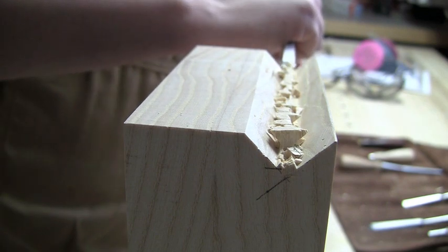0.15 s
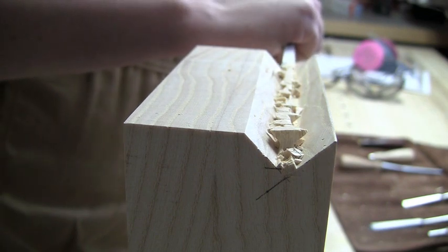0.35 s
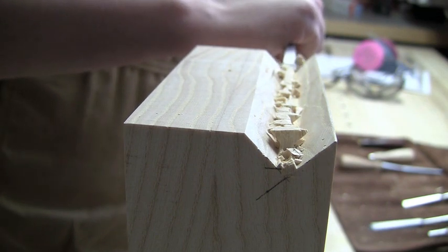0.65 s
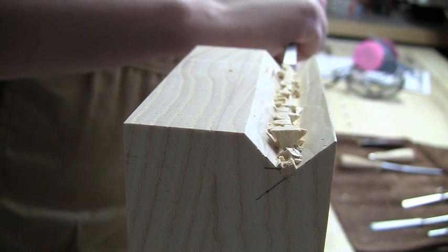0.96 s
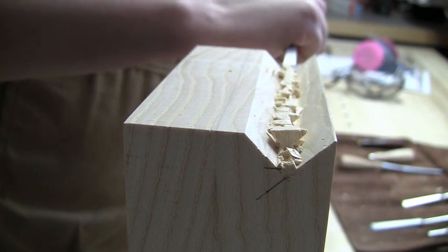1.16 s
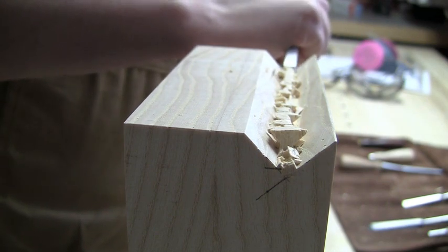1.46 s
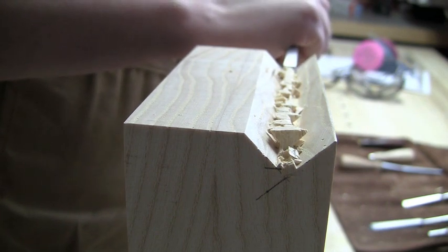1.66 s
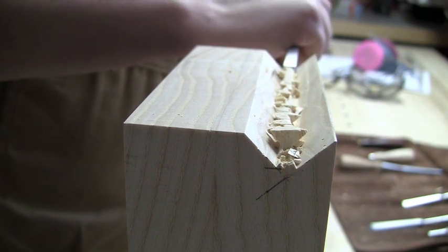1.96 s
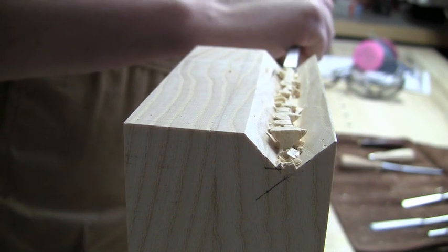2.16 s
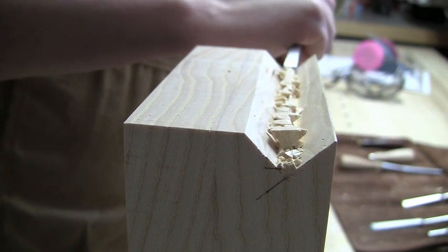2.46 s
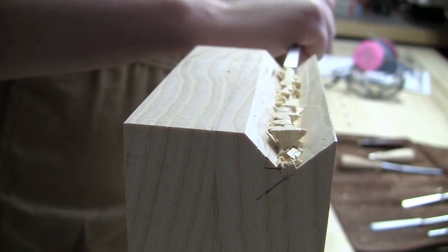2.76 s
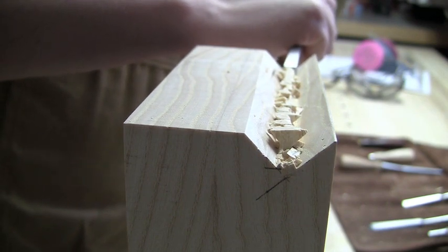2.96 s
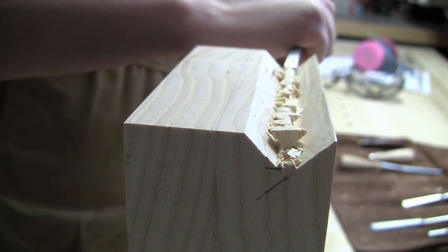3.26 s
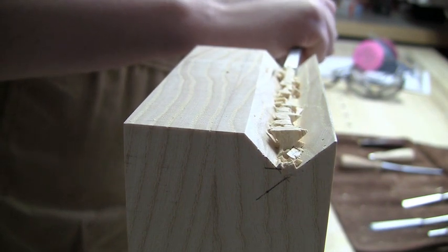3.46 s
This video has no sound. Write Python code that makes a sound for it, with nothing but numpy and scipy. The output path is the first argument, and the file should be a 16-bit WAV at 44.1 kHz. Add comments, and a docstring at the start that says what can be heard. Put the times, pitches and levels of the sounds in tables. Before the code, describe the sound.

Sharp woody chisel knocks at about four a second, turning deeper halfway, with short room ring

```python
"""A quiet workshop still rings from an earlier blow: noise shaped by pitch and left to die away.
Then a mallet drives a chisel into a wooden block, about four blows a second, close to the microphone.
Each blow is a shove, fading chisel tones and a crunch of noise; bench tones and room noise ring on behind.
Halfway the chisel takes a new bite and the blows turn deeper. Later, fibres tear and chips tick as
grainy bursts of hiss. The microphone bends the loudest cracks against its ceiling."""
import sys
import numpy as np
from scipy import signal
from scipy.fft import rfft, irfft
from scipy.io import wavfile
from scipy.ndimage import uniform_filter1d

SR = 44100
rng = np.random.default_rng(int(sys.argv[2]) if len(sys.argv) > 2 else 0)


def digitize_waveform(pressure):
    """Quantize a signal to 16-bit integers and store it at the path in sys.argv[1].

    Rows of a 2-D input are taken as channels; values are limited to [-1, 1].
    """
    field = np.atleast_2d(pressure).T
    bounded = np.clip(field, -1, 1)
    quanta = np.round(bounded * 32767).astype(np.int16)
    wavfile.write(sys.argv[1], SR, quanta)


N = 158760

# steady workshop background: (frequency [Hz], relative level [dB])
BACKGROUND_SPECTRUM = [(20, -9.5), (50, -30), (75, 20.5), (105, 24.5), (200, -13.5), (500, -11.5),
                       (1500, -63), (4000, -43), (9000, -21.5), (16000, -43)]
# how alike the two channels of a noise are: (frequency [Hz], likeness [0 to 1])
CHANNEL_LIKENESS = [(60, .93), (250, 0.93), (640, 0.84), (1400, 0.39), (3100, 0.75), (6800, 1), (15000, 1)]
# workshop reverberation: (frequency [Hz], relative level [dB])
ROOM_SPECTRUM = [(30, -63.5), (75, -8.5), (130, -4), (210, -3), (290, -6.5), (420, -2), (520, 0.5),
                 (660, -4.5), (820, -5.5), (1180, -7), (1550, -3), (1950, -8), (2220, -13), (2600, -8),
                 (2950, -9.5), (3550, -10.5), (4250, -13.5), (5300, -19), (5800, -19), (6600, -25.5),
                 (7300, -25), (8700, -28), (10400, -37), (12000, -34), (16000, -64)]
# basic fading of the room: (frequency [Hz], time to fall by 60 dB [s])
ROOM_FADE = [(60, 1), (250, 0.72), (1000, 0.77), (3000, 0.61), (6000, 0.52), (14000, 0.28)]
# tearing fibres and chips: (time [s], level [dB], time to fade to 37 % [s])
CHIP_EVENTS = [(2.553, -46, 0.037), (2.609, -38.5, 0.036), (2.79, -49, 0.043), (3.387, -37.5, 0.011)]
# hiss of tearing fibres: (frequency [Hz], relative level [dB])
CHIP_SPECTRUM = [(500, -28), (4000, 0), (7200, 4.5), (9500, 0), (12500, -1), (16000, -21)]
# bench and workshop tones, before the sustain factor: (frequency [Hz], relative level in first bite [dB],
# relative level in second bite [dB], time to fall by 60 dB [s])
BENCH_TONES = [(138, -9, -7, .6), (172, -3, -2, .6), (235, 3, 4, .3), (347, -3, -1, .36),
               (398, -10, -9, .42), (466, -4, -2, .3), (529, -2, 4, .3), (549, -4, -4, .45),
               (618, -5, -4, .42), (704, -9, -7, .4), (806, -9, -3, .44), (936, -5, -8, .36),
               (967, -8, -9, .35), (1002, -2, -6, .43), (1037, -5, -11, .42), (1170, -7, -10, .33),
               (1311, -9, -10, .4), (1381, -2, -1, .35), (1437, -6, -7, .4), (1568, -9, -6, .33),
               (1605, -9, 0, .35), (1678, -7, -6, .33), (1900, -9, -9, .3), (2855, -8, -11, .33),
               (3185, -9, -14, .33), (4300, -16, -15, .3), (6030, -17, -21, .3)]
# strongly damped chisel and block tones, before each blow's pitch and length factors: (frequency [Hz],
# relative level in first bite [dB], relative level in second bite [dB], time to fall by 60 dB [s])
CHISEL_TONES = [(273, -25, -20, 0.031), (482, -27.5, -1.5, 0.0091), (700, -6.5, -3, 0.01),
                (864, 4, -2, 0.013), (1191, -3, -3, 0.027), (1398, -17.5, -4.5, 0.036), (1915, 1, 4.5, .01),
                (2670, 0, -26, 0.017), (2920, -8.5, -3, 0.016), (3280, -11.5, 0, 0.0067),
                (3920, -5, -13.5, 0.019), (4430, 6, 14, 0.002), (5100, -28, -37, 0.0017)]
# crunch of the wood: (frequency [Hz], relative level [dB])
CRUNCH_SPECTRUM = [(100, -20), (700, -4), (3000, 4), (6000, 0.5), (10000, -14), (16000, -17.5)]
# mallet blows: (time [s], chisel pitch [factor], length [factor], then the strengths of
# thud [dB], knock [dB], clack [dB], crack [dB], splinter [dB])
BLOWS = [(0.1114, 1.19, 0.84, -0.2, -2, 0.1, -0.5, -0.5), (0.353, 1.16, 0.95, -2.8, -1, 0, 1, 8),
         (0.6001, 0.93, 1.23, -8, -2.5, -1, 2.8, 1.5), (0.8334, 1.02, 1.09, -8.5, -1.5, -1.7, 1.6, 0.9),
         (1.0706, 1.076, 1.2, -4, -1.5, 1, 0.4, 6), (1.2985, 1.02, 1.08, -7, -1.5, -1, 3.4, -3.2),
         (1.5318, 0.96, 1.23, -8.5, -2.5, -0.6, -1.1, 4), (1.804, 1.02, 1.15, -1, -6, -5, -13.5, -18),
         (2.026, 0.96, 1.04, 1, -1.4, -0.9, -2, -6.5), (2.247, 1, 1.3, 3.5, -1.5, 0, -6, -2.5),
         (2.4697, 1, 1.2, 2.5, -1.4, 1, -1.9, -2.0), (2.6987, 1.01, 1.18, 3, -0.8, 1.5, -2.2, -0.8),
         (2.9389, 1.02, 1.21, 2, -2.5, 0, 1.2, -1), (3.1835, 1.03, 0.96, -0.9, -1.5, -0.3, 2, 6),
         (3.4205, 1.076, 1.14, -7, -0.5, -3, 0.2, -2.9)]
# centres of thud, knock, clack, crack and splinter: (frequency [Hz])
STRENGTH_CENTRES = [400, 1000, 2100, 4600, 10000]

BACKGROUND_DB, LINGERING_DB = -44, -19.5
ROOM_DB, ROOM_RISE_S = -18, 0.0024
ROOM_SHARED = 0.42  # part of the room's power that is the same after every blow
EARLY_DB, EARLY_S = -4, 0.011  # extra level of the first reflections, and how fast it fades
LATE_S, LATE_DB_PER_S, LATE_MAX_DB = 0.12, 74.5, 6.5  # after this age the tail sinks faster for a while
RIPPLE_DB, RIPPLE_STEP_HZ = 3, 300
BENCH_DB, BENCH_SUSTAIN = -24, 1.15  # level, and a factor on the fading times
PUSH_DB, PUSH_S = 0.5, 0.00038
CHISEL_DB, CHISEL_RISE_S = 4, 0.00092
CHISEL_DETUNE = 0.008  # typical random pitch change, as a fraction
CRUNCH_DB, CRUNCH_PEAK_S = -5, 0.0014  # the peak time is stretched by each blow's length factor
CONTACT_S, AFTER_CONTACT_DB = 0.003, -7  # contact time before the length factor; level drop after it
BASS_HZ = 49.6  # below this all blows have the same tone
NEW_BITE_S = 1.7
LOW_CUT_HZ, HIGH_CUT_HZ = 97, 16200
CEILING, KNEE = 0.88, 2.5  # microphone ceiling and the hardness of its knee


def amp(db):
    """Turns decibels into a gain."""
    return 10 ** (np.asarray(db) / 20)


def unit(x):
    """Scales a sound to an average strength (rms) of 1."""
    return x / np.sqrt(np.mean(x ** 2) + 1e-20)


def read(points, hz):
    """Reads between the points of a table; equal musical steps are about equally wide."""
    table_hz, value = np.transpose(points)
    return np.interp(np.log(hz + 1), np.log(table_hz + 1), value)


def add(mix, start, sound):
    """Mixes a sound in at a time in seconds, cut off at the end of the mix."""
    part = mix[:, round(start * SR):][:, :sound.shape[-1]]
    part += sound[..., :part.shape[1]]


def colour(x, points, size=4096):
    """Filters with the table's levels, without letting any sound out before its cause."""
    hz = abs(np.fft.fftfreq(size, 1 / SR))
    log_gain = np.log(amp(read(points, hz)))
    # the Hilbert transform finds the phase that makes the filter react as early as possible
    response = np.exp(np.conj(signal.hilbert(log_gain)))
    taps = np.fft.ifft(response).real[:size // 2]
    return signal.fftconvolve(x, taps[None], axes=1)[:, :x.shape[1]]


def noise(points, size):
    """Stereo noise with a given spectrum: a shared middle plus a side that differs in sign."""
    hz = np.fft.rfftfreq(size, 1 / SR)
    mid, side = rfft(rng.standard_normal((2, size))) * amp(read(points, hz))
    like = np.clip(read(CHANNEL_LIKENESS, hz), 0, 0.995)
    mid, side = mid * np.sqrt(1 + like), side * np.sqrt(1 - like)
    return unit(irfft(np.array([mid + side, mid - side]), size))


def background():
    """The quiet of the workshop: steady noise, with its own balance of low and high."""
    return amp(BACKGROUND_DB) * noise(BACKGROUND_SPECTRUM, N)


def sag(t):
    """The late tail sinks by a few extra decibels."""
    return amp(-np.clip(LATE_DB_PER_S * (t - LATE_S), 0, LATE_MAX_DB))


def reverberation(t):
    """Dense reflections sound like noise, each band dying at its own speed."""
    hz, s, bands = signal.stft(noise(ROOM_SPECTRUM, len(t)), SR, nperseg=256)
    bands = bands * amp(-60 * s / read(ROOM_FADE, hz)[:, None])
    tail = signal.istft(bands, SR)[1][:, :len(t)]
    early = 1 + amp(EARLY_DB) * np.exp(-t / EARLY_S)
    rise = np.minimum(t / ROOM_RISE_S, 1) ** 2
    return amp(ROOM_DB) * tail * early * sag(t) * rise


def lingering(level_db):
    """The room still rings from an earlier blow; the level is on top of the room's own."""
    return amp(level_db) * reverberation(np.arange(N) / SR)


def ripple():
    """Random ups and downs over the treble, new on each call: (frequency [Hz], level [dB])."""
    hz = np.arange(1500, 16000, RIPPLE_STEP_HZ)
    db = RIPPLE_DB * rng.standard_normal(len(hz))
    return [(1200, 0), *zip(hz, db)]


def room_after_blow(t, common):
    """Every blow's reflections are partly the same and partly new, with a new treble ripple."""
    mixed = np.sqrt(ROOM_SHARED) * common + np.sqrt(1 - ROOM_SHARED) * reverberation(t)
    return colour(mixed, ripple())


def chips():
    """Wood fibres letting go: fading hiss whose level jitters in tiny grains."""
    out, t = np.zeros((2, N)), np.arange(SR // 4) / SR
    for start, db, decay in CHIP_EVENTS:
        # averaging over 40 samples makes grains of about a millisecond
        jitter = uniform_filter1d(rng.standard_normal(len(t)), size=40) * np.sqrt(40)
        grains = unit(amp(3.7 * jitter))
        add(out, start, amp(db) * noise(CHIP_SPECTRUM, len(t)) * grains * np.exp(-t / decay))
    return out


def bite_tones(table, start, pitch, sustain):
    """The tones the current bite wakes: (frequency [Hz], level [dB], time to fall by 60 dB [s])."""
    return [(hz * pitch, first if start < NEW_BITE_S else second, t60 * sustain)
            for hz, first, second, t60 in table]


def ring(tones, t, detune, scatter_db, spread, stagger_s=0):
    """Struck solids ring in fading tones; pitch, level, channel phase and start vary by chance."""
    out = np.zeros((2, len(t)))
    opposite = np.array([[1], [-1]])
    for hz, db, t60 in tones:
        pitch_luck, level_luck, phase_luck = rng.standard_normal(3)
        age = np.maximum(t - stagger_s * rng.random(), 0)
        phase = 2 * np.pi * hz * (1 + detune * pitch_luck) * age
        # the channels drift apart during the first cycle
        phase = phase + spread * phase_luck * opposite * np.minimum(age * hz, 1)
        fade = np.exp(-np.log(1000) * age / t60)
        out -= amp(db + scatter_db * level_luck) * fade * np.sin(phase)
    return out


def bench_ring(t, start):
    """The bench and workshop ring on, their tones starting at slightly different moments."""
    tones = bite_tones(BENCH_TONES, start, 1, BENCH_SUSTAIN)
    tail = ring(tones, t, detune=0.0018, scatter_db=1.45, spread=0.092, stagger_s=0.013)
    return amp(BENCH_DB) * tail * sag(t)


def air_push(t):
    """The first shove of air: one quick swing and its rebound."""
    u = t / PUSH_S
    return -amp(PUSH_DB) * np.e * u * (1 - u / 2) * np.exp(-u)


def chisel_clack(t, start, pitch, length):
    """The chisel and block ring briefly because they are strongly damped."""
    tones = bite_tones(CHISEL_TONES, start, pitch, length)
    clack = ring(tones, t, CHISEL_DETUNE, scatter_db=1, spread=0.017)
    return amp(CHISEL_DB) * clack * (1 - np.exp(-t / CHISEL_RISE_S))


def wood_crunch(t, length):
    """The wood gives way in a burst of noise that rises and fades."""
    v = t / (CRUNCH_PEAK_S * length)
    return amp(CRUNCH_DB) * noise(CRUNCH_SPECTRUM, len(t)) * np.e * v * np.exp(-v)


def edge_contact(t, length):
    """The crack is loudest while the edge is still moving, then drops."""
    stopped = (1 + np.tanh((t - CONTACT_S * length) / 0.00049)) / 2
    return amp(AFTER_CONTACT_DB * stopped)


def chopping():
    """Each blow shoves air, clacks and crunches, then bench and room ring; its strengths set the tone."""
    out, t = np.zeros((2, N)), np.arange(SR * 3 // 4) / SR
    common = reverberation(t)
    for start, pitch, length, *strength_db in BLOWS:
        crack = chisel_clack(t, start, pitch, length) + wood_crunch(t, length)
        direct = air_push(t) + edge_contact(t, length) * crack
        blow = direct + bench_ring(t, start) + room_after_blow(t, common)
        tone = [(BASS_HZ, 0), *zip(STRENGTH_CENTRES, strength_db)]
        add(out, start, colour(blow, tone))
    return out


def scene():
    """Chopping and chips over the lingering room and the quiet of the workshop."""
    return background() + lingering(LINGERING_DB) + chips() + chopping()


def record(dry):
    """The microphone sheds deep bass and bends loud peaks; then the highest treble is cut."""
    dry = signal.lfilter(*signal.butter(1, LOW_CUT_HZ, "high", fs=SR), dry)
    clipped = dry / (1 + abs(dry / CEILING) ** (2 * KNEE)) ** (1 / (2 * KNEE))
    taps = signal.firwin(255, HIGH_CUT_HZ, window=("kaiser", 8), fs=SR)
    return signal.oaconvolve(clipped, taps[None], "same")


dry = scene()
out = record(dry)
digitize_waveform(out)
```